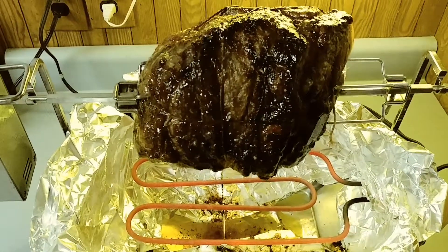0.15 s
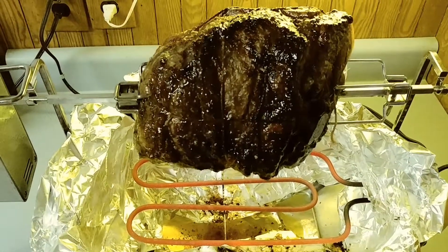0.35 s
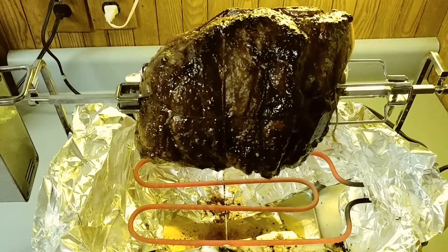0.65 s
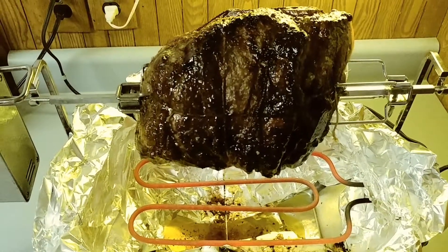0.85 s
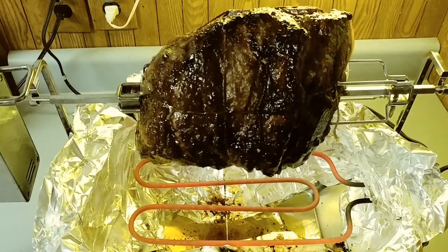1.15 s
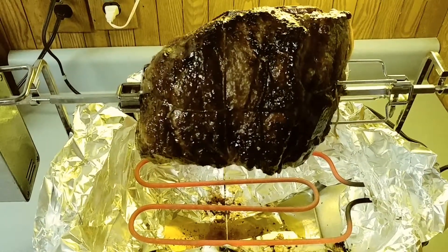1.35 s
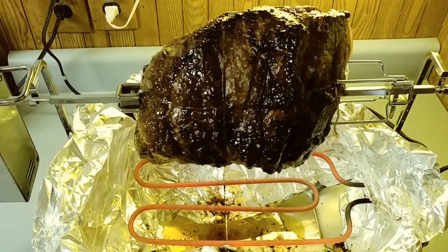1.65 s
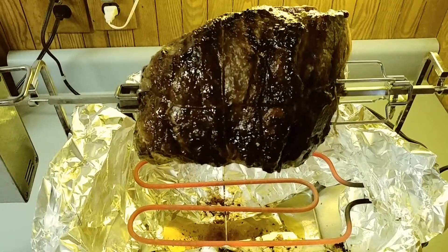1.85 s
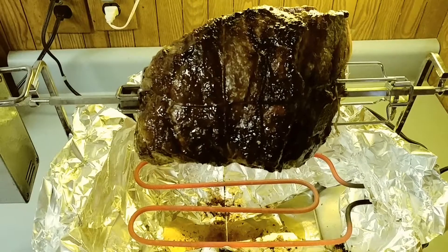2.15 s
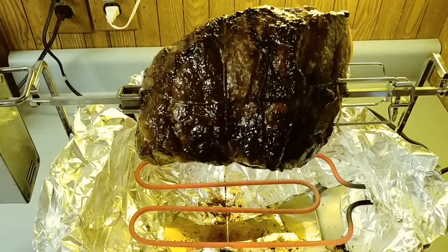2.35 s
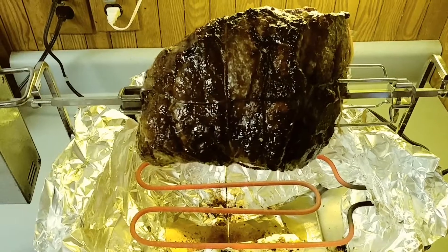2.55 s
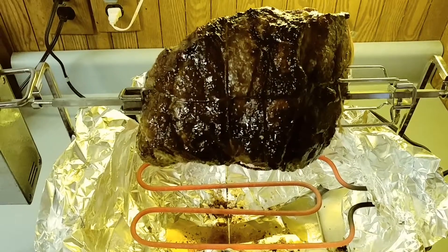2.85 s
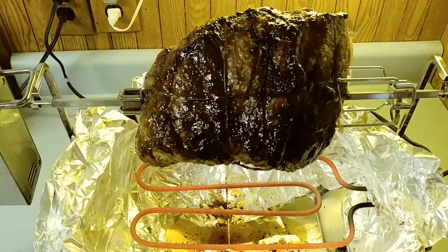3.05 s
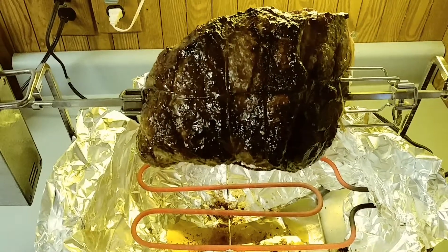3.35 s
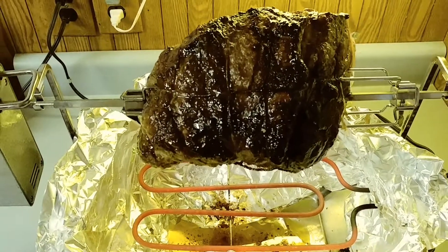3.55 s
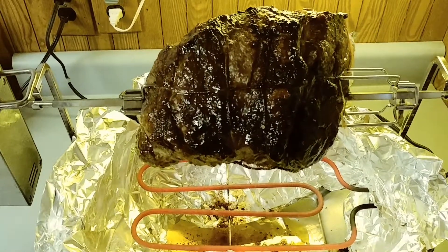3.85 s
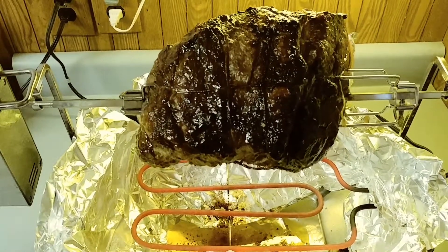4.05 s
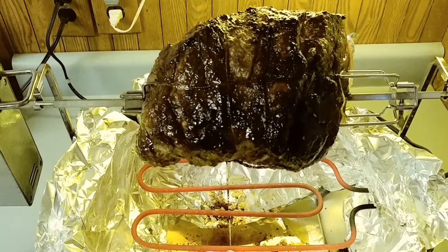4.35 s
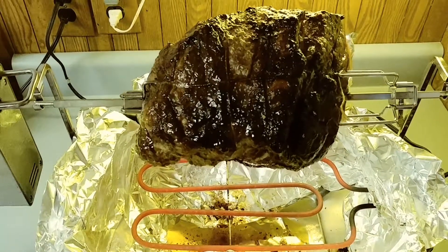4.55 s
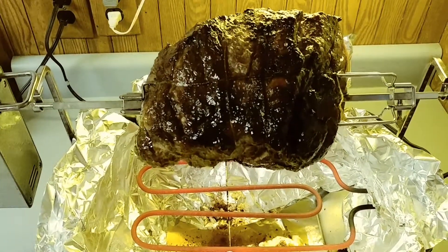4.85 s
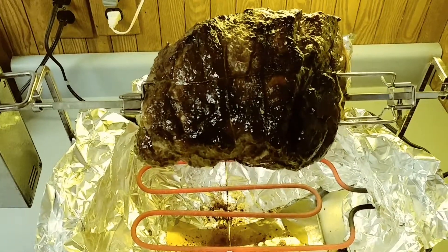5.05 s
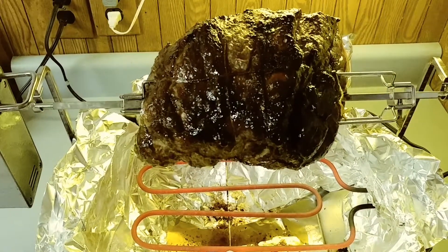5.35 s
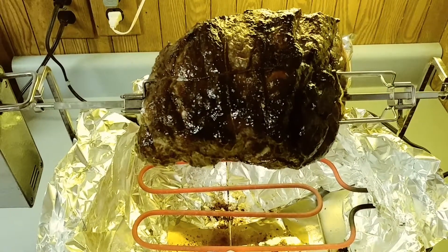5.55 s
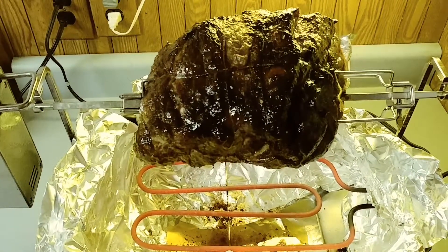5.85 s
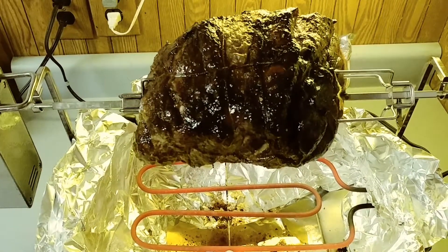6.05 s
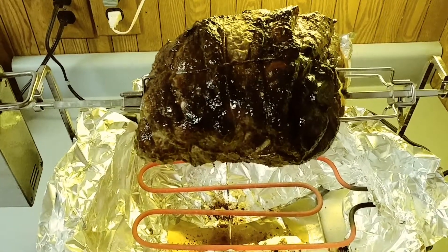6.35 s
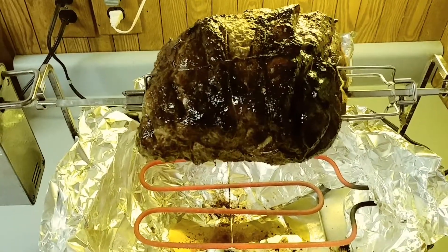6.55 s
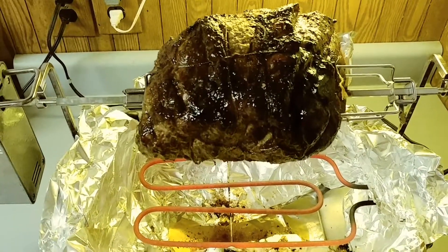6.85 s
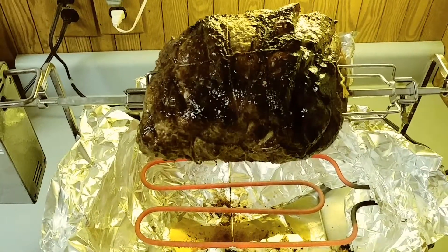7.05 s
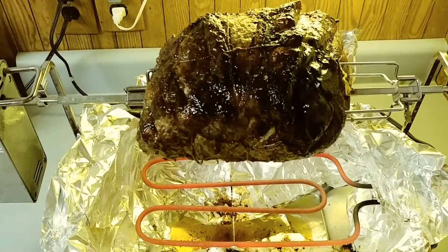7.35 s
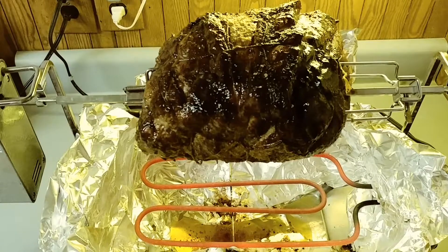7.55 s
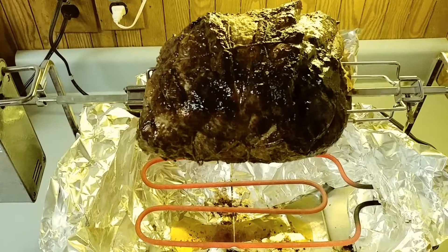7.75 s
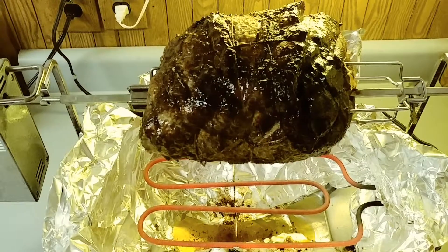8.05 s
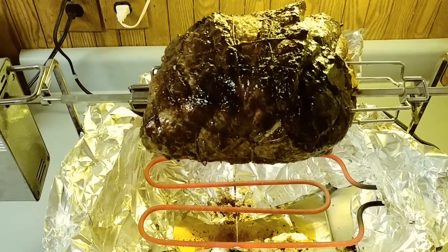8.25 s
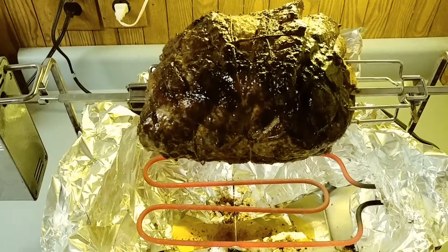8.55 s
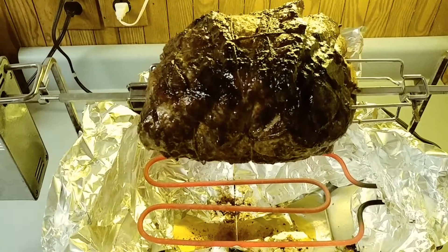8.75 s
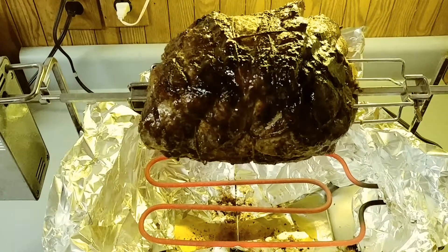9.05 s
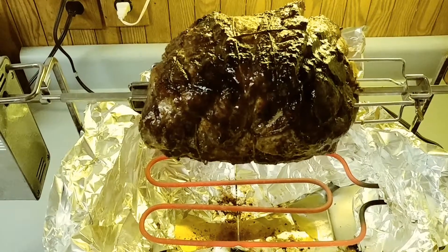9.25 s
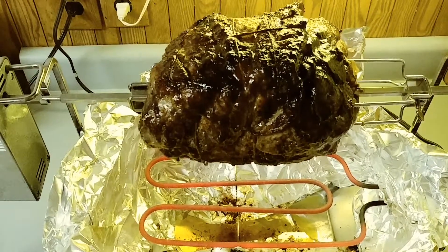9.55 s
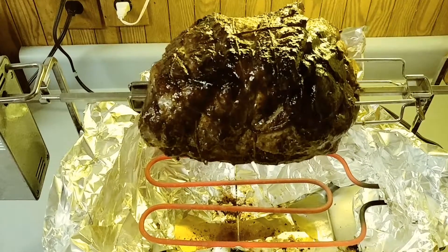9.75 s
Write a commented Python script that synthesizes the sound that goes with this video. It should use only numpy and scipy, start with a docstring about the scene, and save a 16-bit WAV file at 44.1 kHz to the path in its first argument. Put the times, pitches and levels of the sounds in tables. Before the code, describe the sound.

Strained gear grinding and ringing metal jolts from a turning rotisserie, mostly left, with tiny fat crackles and faint dull thumps over quiet room noise.

```python
"""Indoors, close to a roast turning on a spit, its small gear motor on the left.
Gear ticks and jolts of the spit ring the sheet-metal housing and frame through banks of resonances;
slips of the fork add clicks through one broad ring, and bursting fat is coloured crackle.
The motor is a set of wavering tones, the table thumps are sinking tones with puffs of noise,
and shaped room noise lies behind."""
import sys
import numpy as np
from scipy import signal
from scipy.fft import rfft, irfft, next_fast_len
from scipy.io import wavfile
from scipy.ndimage import uniform_filter1d

SR = 44100
rng = np.random.default_rng(int(sys.argv[2]) if len(sys.argv) > 2 else 0)


def dump(signal):
    """Clip the signal to [-1, 1] and save it as 16-bit WAV at the path in sys.argv[1]."""
    limited = np.clip(np.atleast_2d(signal).T, -1, 1)
    pcm = np.round(limited * 32767).astype(np.int16)
    wavfile.write(sys.argv[1], SR, pcm)


N = 436149

# Grinding under the load of the roast: start_s, low_ring_db, sharpness_db (high rings over low);
# gear levels are relative, ahead of the output trim
GRIND = [(0.0, -35, -12.5), (0.66, -38.5, -14), (1.62, -38, -11), (1.82, -39.5, -15.5), (2.26, -41.5, -11),
         (3.11, -54.5, -7), (3.8, -53.5, -9.5), (4.2, -59.5, -2.5), (4.96, -58, -7), (5.3, -63, 6.5),
         (5.65, -57, -7), (6.11, -55.5, -5.5), (6.6, -49.5, 0), (7.13, -61, -3), (7.68, -56.5, -2.5),
         (8.43, -40, -1), (8.84, -41.5, -3), (9.89, -42.5, -3)]
# Jolts of the spit, each a click and a clump of ticks: start_s, low_ring_db, sharpness_db, rise_s
JOLTS = [(0.012, -30.5, -4, 0.03), (0.136, -32.5, -9.5, 0.029), (0.312, -37.5, -9, 0.046),
         (0.376, -32, -5, 0.071), (0.428, -43, 10.5, .003), (0.4355, -22, 0, 0.0061),
         (0.488, -44, 5, 0.021), (0.646, -37, -11, 0.059), (0.663, -38.5, 5, 0.0026),
         (0.775, -27.5, -3.5, 0.0089), (0.924, -39.5, 3, 0.0031), (1.007, -32, -1, 0.011),
         (1.17, -38, -4, 0.0026), (1.189, -34, -11, 0.008), (1.339, -36.5, -1, 0.0056),
         (1.385, -43, 0.5, 0.013), (1.4048, -33, -2, 0.0028), (1.418, -26, -8.5, 0.017),
         (1.43, -41, 9.5, 0.002), (1.522, -42.5, 4, 0.0062), (1.5916, -35.5, 7, 0.014),
         (1.61, -24, -4.5, 0.0021), (1.716, -46, 1, 0.0065), (1.803, -39.5, -3.5, 0.013),
         (1.8352, -35, -0.5, 0.0024), (1.98, -40.5, -1, 0.066), (2.218, -36.5, -6.5, 0.023),
         (2.281, -39, 1.5, 0.003), (2.378, -36.5, -5, 0.017), (2.529, -42.5, -7, 0.036),
         (2.64, -38.5, -9.5, 0.035), (2.723, -42, -6.5, 0.003), (2.807, -37.5, -5.5, 0.0033),
         (2.949, -35, -2.5, 0.018), (3.012, -40, -3.5, 0.02), (3.121, -47.5, -3.5, 0.045),
         (3.335, -44.5, -4.5, 0.012), (3.529, -38, -2, 0.004), (3.601, -48, 4.5, 0.011),
         (3.778, -41.5, 0, 0.0027), (4.052, -47.5, -36, 0.025), (4.214, -39.5, -12.5, 0.0025),
         (4.361, -42.5, -10, 0.039), (4.417, -43, -1, 0.026), (4.564, -49.5, 3, 0.0024),
         (4.867, -53.5, 3.5, .006), (4.915, -46.5, -2.5, 0.02), (5.01, -52, 2, 0.0074),
         (5.156, -42.5, 2.5, 0.011), (5.164, -37.5, 3, 0.0053), (5.241, -43, -0.5, 0.011),
         (5.261, -42.5, 3, 0.0043), (5.287, -41.5, 2.5, 0.0051), (5.304, -36, -2, 0.0057),
         (5.379, -42.5, 0.5, 0.033), (5.447, -47, 2.5, 0.0045), (5.557, -42.5, 0, 0.013),
         (5.589, -43, 0, 0.0038), (5.664, -48, 4, 0.011), (5.694, -46, 3.5, 0.01),
         (5.83, -44.5, 3.5, 0.058), (5.87, -50, 2, 0.051), (5.934, -38, 3, .004),
         (6.02, -47.5, 1.5, 0.0052), (6.094, -47, 3, 0.0031), (6.14, -41, 0, 0.023), (6.19, -38, 3, .0032),
         (6.248, -43, 2, 0.0046), (6.362, -46.5, 3.5, 0.0034), (6.403, -49, 4.5, 0.031),
         (6.482, -37.5, -0.5, 0.0032), (6.516, -32.5, -0.5, 0.012), (6.573, -41.5, 2.5, 0.025),
         (6.661, -41, 1, 0.014), (6.691, -34, 1.5, 0.013), (6.727, -38, -1.5, 0.006),
         (6.761, -42.5, 2.5, 0.0049), (6.79, -43, 0, 0.032), (6.876, -39.5, 2, 0.0045),
         (6.94, -37, -1, 0.0075), (6.986, -39.5, -5, 0.0038), (7.066, -35.5, 3, 0.025),
         (7.122, -37.5, 4, 0.0074), (7.158, -39.5, 0.5, 0.029), (7.228, -42.5, 0.5, 0.023),
         (7.3, -42, -1.5, 0.0045), (7.335, -38, 1, 0.036), (7.414, -43, 1, 0.029), (7.467, -37.5, 4, 0.039),
         (7.519, -38.5, 0.5, 0.028), (7.622, -47, 1.5, 0.019), (7.67, -39.5, -4, 0.0071),
         (7.685, -36, -1.5, 0.03), (7.822, -41, -8, 0.023), (7.882, -43, -2.5, 0.037),
         (7.934, -41.5, 4.5, 0.01), (7.983, -32.5, 3.5, 0.0022), (8.079, -30, -3, 0.0029),
         (8.18, -42, -1.5, 0.049), (8.254, -41, 2, 0.0068), (8.335, -37.5, 2.5, 0.0051),
         (8.443, -35.5, 1, 0.011), (8.497, -29, -1, 0.01), (8.571, -48.5, 3.5, 0.042),
         (8.627, -43, -2, 0.0082), (8.686, -35, -3.5, 0.028), (8.766, -46, -12, 0.0043),
         (8.891, -40.5, -1.5, .0038), (8.936, -37.5, -3, 0.0042), (9.003, -42.5, 0.5, 0.046),
         (9.059, -42.5, 2, 0.024), (9.089, -37.5, 1, 0.013), (9.264, -35.5, -2, 0.023),
         (9.285, -32.5, -0.5, 0.005), (9.517, -39.5, 0.5, 0.0049), (9.556, -44, 2, 0.0095),
         (9.577, -42.5, 4.5, .006), (9.661, -36.5, -0.5, 0.012), (9.691, -33.5, -4, 0.013),
         (9.73, -42, 1.5, 0.024), (9.832, -43, 4, 0.015)]
# Housing and microphone colour: pitch_hz, relative_db (per Hz)
BODY_COLOUR = [(290, -33.5), (650, -21.5), (850, -8), (1150, -13.5), (1400, -7.5), (1900, -4.5), (2250, -3),
               (3400, -6), (4600, -22.5), (5150, -6.5), (6930, -33.5), (8500, -15), (10900, -45.5),
               (12800, -37.5), (15800, -44)]
# Resonant modes of the metal, one entry a mode: pitch_hz
MODE_HZ = [795, 860, 1013, 1399, 1706, 2047, 2180, 2295, 2436, 2597, 2752, 2817, 2915, 3070, 3150, 3310,
           4180, 4600, 4830, 6200]
# The same modes, one row each: width_hz, gearbox_db, mount_db (both over the body colour)
MODES = [(23.8, 13, 5), (27, -3, 4), (28.2, 13.5, -3), (37, 15, 12), (17.7, 3, -2), (27.2, 0, 0),
         (42.6, 13.5, 11), (51, 16.5, 9), (17.9, 10, -5), (26, 19.5, 7), (21.7, 15, -15), (13.7, -16, -1),
         (24.6, 10.5, 4.5), (27.4, -4, -25), (29.2, 11, 2.5), (40, 13.5, 2), (70.4, -23, 14), (400, -24, 4),
         (56, 6, 10.5), (1220, -7, 5)]
# Edges between low, middle, high and topmost rings: edge_hz
RING_EDGES = (2900, 4500, 10500)
# Slips of the fork on the rod: start_s, level_db, rise_s, t60_s, ring_hz
SLIPS = [(1.591, -25.5, 0.003, 0.042, 3420), (3.527, -46, 0.0091, 0.08, 3700),
         (3.876, -47, 0.0079, 0.063, 2840), (4.418, -46, 0.028, 0.3, 3130),
         (4.568, -46.5, 0.016, 0.13, 3220), (5.693, -39.5, 0.0066, 0.07, 3280),
         (6.575, -47, 0.035, 0.065, 5700), (6.987, -41, 0.0045, 0.044, 3340), (7.051, -38, .004, .05, 3230)]
# Fat spitting: start_s, peak_db (before colouring), t60_s
SPITS = [(2.531, -43, 0.052), (2.626, -43, 0.071), (3.5976, -37, 0.13), (3.603, -41, .025),
         (3.611, -45, .05), (3.627, -45, 0.041), (3.84, -49, .03), (4.036, -58, 0.035)]
# Colour of the spitting fat: pitch_hz, relative_db (per Hz)
SPIT_COLOUR = [(290, -30), (500, -11), (1340, 1), (2500, -13), (4500, -1.5), (6450, -11), (10000, -11.5),
               (12900, 5), (15800, -1)]
# Table thumps: start_s, peak_db (of the swing), pitch_hz (settled), t60_s, puff_db (over the swing), puff_top_hz
THUMPS = [(0.44, -53, 300, 0.45, 1, 730), (1.599, -58, 60.4, 0.45, -1, 510),
          (3.775, -53, 65, 0.33, -0.5, 900), (5.662, -66.5, 400, 0.22, 14, 1300),
          (6.449, -68, 400, 0.19, 6.5, 800), (8.077, -63.5, 457, 0.36, 2, 720),
          (8.605, -49.5, 63, 0.13, -11, 300), (9.3, -48.5, 60, 0.084, -9, 398),
          (9.375, -67, 195, 0.06, 5, 300)]
# Motor hum before placement: start_s, level_db
HUM = [(0.0, -57), (3.14, -65), (4.16, -62.5), (4.85, -71), (9.89, -67)]
# Fainter motor tones before placement: pitch_hz, level_db
WHINES = [(120, -85), (290.7, -87.5), (360.7, -76.5)]
# Room noise colour: pitch_hz, relative_db (per Hz)
AIR_COLOUR = [(15, -28), (25, 6.5), (211, -2), (352, -0.5), (654, -5), (857, 8.5), (1150, -5.5),
              (1390, 5.5), (3220, -15), (6850, -15.5), (9210, -5.5), (10800, -24), (15800, -7.5)]
# Full lean between the sides by pitch, mostly left: pitch_hz, left_over_right_db
LEAN = [(60, 35), (120, -32.5), (240, 3), (480, -1), (950, 7), (1890, 5), (3770, 12.5), (7520, 9),
        (15000, -2)]
# Room tail: pitch_hz, t60_s
DECAY = [(500, 0.31), (2000, 0.35), (5000, 0.099), (10000, 0.1), (15000, 0.043)]

GRIND_MIDDLE_DB = -3.5  # middle rings over low
LUMPS_DB, LUMP_S = 2., 0.033  # small random jolts make the grinding lumpy
# every jolt and slip starts suddenly at a share of full power, grows, then dies
START_S, START_SHARE, GROWTH = 0.00055, 0.57, 0.8  # growth is the power share added per rise time
JOLT_T60_S = 0.11
MIDDLE_PER_DB, MIDDLE_DB = 1, 2  # a sharper jolt also wakes the middle rings
TOP_PER_DB, TOP_DB = 2.5, -6  # the topmost rings answer only to sharp contact
CLICK_DB, CLICK_RISE_S = 9, .004  # first clean click over the clump; jolts rising slower click less
KICKS_PER_S, KICK_JITTER = 88, .2  # gear teeth knock nearly evenly; jitter is a share of the gap
KNOCK_BOOST = 1.27  # gain: in the gearbox the knocks stand out over the grinding
PATCH_DB, PATCH_HZ, PATCH_S = 1.2, 700., .03  # the contact wanders, shifting the ring colour in patches
EDGE_HZ = 15850  # top of the band
WANDER_RAD = 2.5  # rms drift of the right ear's phase at EDGE_HZ, in proportion below
SLIP_CLICK_DB, SLIP_WIDTH_HZ = 5., 1700.  # first click over the ticks; width of the ring
SPIT_POP_DB = 19.  # opening burst of each spit over its crackle
SIZZLE_DB = -74.5  # faint steady crackle of the fat, before colouring
ROAST_LEAN = 0.78  # share of the lean: the roast sits nearer the middle than the motor
SINK_HZ, SINK_S = 143, 0.0053  # each thump starts this much higher and sinks to its pitch
THUMP_RISE_S, THUMP_HOLD_S = 0.0027, 0.018  # the decay waits for the hold
HUM_HZ, HUM_WANDER_HZ = 56, 7
RUMBLE_HZ, RUMBLE_PER_DB = 300., .5  # the bass of the room noise rises and falls with the hum
AIR_DB = -58  # reference level of the room noise


def gears():
    """Ticks follow grinding and jolts; where the contact falls decides which rings of the metal answer."""
    power, blows = gear_drive()
    t = np.arange(N) / SR
    s, _, sharp_db = np.transpose(GRIND)
    # sharp grinding comes from the spit mount
    mount = np.clip((np.interp(t, s, sharp_db) + 14.5) / 10.6, .08, .92)
    gearbox = metal(1, power, blows, 1 - mount)
    heard = room(gearbox, wet_db=[[-7.], [-4.]], count=18)
    heard = heard + room(metal(2, power, blows, mount), wet_db=[[-7.], [-4.]], count=11)
    return amp(-3.0) * patchy(heard)


def shares(middle_db, sharp_db):
    """Levels in dB of the low, middle, high and topmost rings over the low ones."""
    return 0, middle_db, sharp_db, TOP_PER_DB * sharp_db + TOP_DB


def gear_drive():
    """Tick power and single clicks for each ring band: lumpy grinding with jolts on top."""
    s, low_db, sharp_db = np.transpose(GRIND)
    t = np.arange(N) / SR
    width = max(round(LUMP_S * SR), 2)
    lumps = uniform_filter1d(uniform_filter1d(rng.standard_normal(N), width), width)
    lumps = LUMPS_DB * evened(lumps)
    power = np.array([amp(2 * (np.interp(t, s, low_db + over_db) + lumps))
                      for over_db in shares(GRIND_MIDDLE_DB, sharp_db)])
    blows = np.zeros((4, N))
    for at, db, sharp, rise in JOLTS:
        low = clump(db, rise, JOLT_T60_S)
        click_share = min(CLICK_RISE_S / rise, 1) ** 2
        for k, over_db in enumerate(shares(MIDDLE_PER_DB * sharp + MIDDLE_DB, sharp)):
            add(power[k], at, low * amp(2 * over_db))
            add(blows[k], at, amp([db + over_db + CLICK_DB]) * click_share)
    return power, blows


def metal(place, power, blows, share):
    """Ticks and clicks ring the modes as heard from the gearbox (place 1) or the spit mount (place 2)."""
    hz = np.fft.rfftfreq(16384, 1 / SR)
    below = [1 / (1 + (hz / edge) ** 12) for edge in RING_EDGES]
    bands = np.diff([0 * hz, *below, 1 + 0 * hz], axis=0)
    modes = sum(amp(2 * row[place]) / (1 + (2 * (hz - f) / row[0]) ** 2)
                for f, row in zip(MODE_HZ, MODES))
    responses = [causal(amp(read(BODY_COLOUR, hz)) * np.sqrt((1 + modes) * band)) for band in bands]
    dense = ticks(per_s=900., spread_db=1.0, hiss=0.93)
    if place == 1:
        sparse = KNOCK_BOOST * kicks(spread_db=3.5)
        responses[3] *= amp(-15.)  # the closed gearbox muffles its topmost rings
    else:
        sparse = ticks(per_s=120., spread_db=5.5, hiss=0.19)
    ring = 0
    hardness = (0.39, 0.43, 1.18, 1.2)  # hard knocks favour high rings
    for response, p, blow, hard in zip(responses, power, blows, hardness):
        uneven = ticks(per_s=900., spread_db=6.0, hiss=0.28)
        stream = evened(dense + hard * sparse + 0.89 * uneven)
        drive = (stream * np.sqrt(p) + blow) * np.sqrt(share)
        ring = ring + signal.oaconvolve(drive, response)[:N]
    return ring


def kicks(spread_db):
    """Nearly regular knocks of the gear teeth, uneven in size."""
    jitter, size = rng.standard_normal((round(N / SR * KICKS_PER_S), 2)).T
    at = (np.arange(len(size)) + KICK_JITTER * jitter) * SR / KICKS_PER_S
    out = np.zeros(N)
    out[np.clip(at.astype(int), 0, N - 1)] = amp(spread_db * size)
    return evened(out)


def clump(db, rise, t60):
    """Power of a clump of ticks: sudden start, growth, decay."""
    u = np.arange(SR // 4) / SR
    swell = np.minimum(u / START_S, 1) * np.minimum(START_SHARE + GROWTH * u / rise, 1)
    return swell * amp(2 * (db - 60 * np.maximum(u - rise, 0) / t60))


def patchy(x):
    """Random patches of time and pitch grow louder or softer, and the right ear's phase drifts."""
    hz, t, z = signal.stft(x, SR, nperseg=256, noverlap=192)
    field = rng.standard_normal((len(t), len(hz), 2))
    for axis, size in enumerate((round(PATCH_S * SR / 64), round(PATCH_HZ * 256 / SR))):
        field = uniform_filter1d(uniform_filter1d(field, size=size, axis=axis), size=size, axis=axis)
    loud, drift = evened(field).T
    turn = np.exp(1j * WANDER_RAD * drift * (hz / EDGE_HZ)[:, None])
    z = z * evened(amp(PATCH_DB * loud)) * [1 + 0 * turn, turn]
    return signal.istft(z, SR, nperseg=256, noverlap=192)[1][:, :N]


def slips():
    """The fork slips on the rod: a click and a clump of ticks through one broad ring."""
    out, hz = np.zeros(N), np.fft.rfftfreq(1024, 1 / SR)
    scrape = ticks(per_s=920.0, spread_db=1.0, hiss=0.3)
    for at, db, rise, t60, ring_hz in SLIPS:
        level = np.sqrt(clump(db, rise, t60))
        drive = level * scrape[round(at * SR):][:len(level)]
        drive[0] = amp(db + SLIP_CLICK_DB)
        skirts = (hz / ring_hz) ** 2 / (1 + (hz / ring_hz) ** 4)
        peak = 1 / (1 + (2 * (hz - ring_hz) / SLIP_WIDTH_HZ) ** 2)
        add(out, at, np.convolve(drive, causal(skirts * peak)[:256]))
    return room(out, wet_db=[[-7.], [-4.]], count=11)


def spits():
    """Bursting fat: a pop opens each bright puff of fine crackle, over a faint steady sizzle."""
    level, pops, u = np.zeros(N), np.zeros(N), np.arange(SR // 3) / SR
    for at, db, t60 in SPITS:
        add(level, at, amp(db - 60 * u / t60))
        add(pops, at, amp([db + SPIT_POP_DB]))
    colour = causal(amp(read(SPIT_COLOUR, np.fft.rfftfreq(2048, 1 / SR))))
    crackle = (level + amp(SIZZLE_DB)) * ticks(per_s=240.0, spread_db=2.5, hiss=0.47)
    return signal.oaconvolve(pops + crackle, colour)[:N]


def motor():
    """The hum rises and falls along its own level curve; fainter tones waver above it."""
    s, db = np.transpose(HUM)
    hum = amp(np.interp(np.arange(N) / SR, s, db)) * wavering(HUM_HZ, HUM_WANDER_HZ)
    return hum + sum(amp(db) * wavering(hz, wander_hz=4.7) for hz, db in WHINES)


def wavering(hz, wander_hz):
    """A tone whose size and phase wander slowly around a steady core."""
    slow = signal.butter(2, wander_hz, fs=SR, output="sos")
    a, b = signal.sosfilt(slow, rng.standard_normal((2, N)))
    core = np.exp(2j * np.pi * hz * np.arange(N) / SR)
    return evened((core * (1 + 0.33 * (evened(a) + 1j * evened(b)))).real)


def thumps():
    """The table swings dully, sinking in pitch, with a woody puff of band-passed noise."""
    out, u = np.zeros(N), np.arange(SR // 3) / SR
    noise = rng.standard_normal((len(THUMPS), len(u)))
    for (at, db, hz, t60, puff_db, top_hz), puff in zip(THUMPS, noise):
        band = signal.butter(2, [top_hz / 3.0, top_hz], "band", fs=SR, output="sos")
        puff = evened(signal.sosfilt(band, puff))
        swing = np.sin(2 * np.pi * np.cumsum(hz + SINK_HZ * np.exp(-u / SINK_S)) / SR)
        fall = amp(db - 60 * np.maximum(u - THUMP_HOLD_S, 0) / t60)
        add(out, at, fall * np.minimum(u / THUMP_RISE_S, 1) * (swing + amp(puff_db) * puff))
    return out


def air():
    """Room noise, partly shared in the bass and separate in the treble; its bass moves with the hum."""
    size = next_fast_len(N, True)
    hz = np.fft.rfftfreq(size, 1 / SR)
    left, other = rfft(rng.standard_normal((2, size)))
    same = 0.57 / (1 + hz / 900)
    z = np.array([left, same * left + np.sqrt(1 - same ** 2) * other]) * amp(read(AIR_COLOUR, hz))
    bass = 1 / (1 + (hz / RUMBLE_HZ) ** 2)
    s, db = np.transpose(HUM)
    swell = amp(RUMBLE_PER_DB * np.interp(np.arange(N) / SR, s, db - db.mean()))
    rumble = swell * irfft(z * bass, size)[:, :N]
    return amp(AIR_DB) * evened(rumble + irfft(z * (1 - bass), size)[:, :N])


def room(x, wet_db, count, lean_share=1):
    """Direct sound, softer and count samples later on the right, a tail of its own each side, then the lean."""
    hz, t, z = signal.stft(rng.standard_normal((2, SR // 2)), SR, nperseg=128)
    taps = signal.istft(z * amp(-60 * t / read(DECAY, hz)[:, None]), SR, nperseg=128)[1]
    taps *= amp(wet_db) / np.linalg.norm(taps, axis=1, keepdims=True)
    taps[:, :40] = 0  # the tail waits for the direct sound
    taps[0, 0], taps[1, count] = 1, .6
    lean = lean_share * read(LEAN, np.fft.rfftfreq(1024, 1 / SR)) / 2
    sides = np.array([np.fft.fftshift(irfft(amp(lean))), np.fft.fftshift(irfft(amp(-lean)))])
    heard = signal.fftconvolve(x[None], taps, axes=1)[:, :N]
    return signal.oaconvolve(heard, sides, "same", axes=1)


def ticks(per_s, spread_db, hiss):
    """Random clicks of uneven size over scraping noise."""
    size = amp(spread_db * np.minimum(rng.exponential(1, N), 3.)) * (rng.random(N) < per_s / SR)
    clicks = evened(size * rng.choice([-1., 1.], N))
    return evened(clicks + hiss * rng.standard_normal(N))


def causal(gain):
    """Minimum-phase impulse response of energy 1 for a gain given from 0 Hz to SR / 2."""
    log = np.log(np.maximum(np.r_[gain, gain[-2:0:-1]], 1e-5))
    response = np.fft.ifft(np.exp(np.conj(signal.hilbert(log)))).real[:len(gain)]
    return response / np.linalg.norm(response)


def amp(db):
    """Gain of a level in dB."""
    return 10 ** (np.asarray(db) / 20)


def evened(x):
    """Scaled to rms 1."""
    return x / np.sqrt(np.mean(x ** 2) + 1e-20)


def read(points, hz):
    """A table of (Hz, value) read on a log-frequency axis."""
    f, value = np.transpose(points)
    return np.interp(np.log(hz + 1), np.log(f + 1), value)


def add(mix, s, sound):
    """Adds a sound into the mix at second s."""
    part = mix[round(s * SR):][:len(sound)]
    part += sound[:len(part)]


def scene():
    """Metal and fat in the room, motor and table through the tabletop, room noise."""
    fat = room(spits(), wet_db=[[-4.], [-3.]], count=5, lean_share=ROAST_LEAN)
    near = gears() + slips() + fat
    tabletop = (motor() + thumps()) * amp([[.7], [-.7]])  # dB gains, left and right, in the same polarity
    return near + tabletop + air()


def record(dry):
    """The microphone drops the deepest bass; then the band limit."""
    thin = signal.sosfilt(signal.butter(2, 42., "high", fs=SR, output="sos"), dry)
    return signal.oaconvolve(thin, signal.firwin(511, EDGE_HZ, window=("kaiser", 9), fs=SR)[None], "same")


dry = scene()
out = record(dry)
dump(out)
```